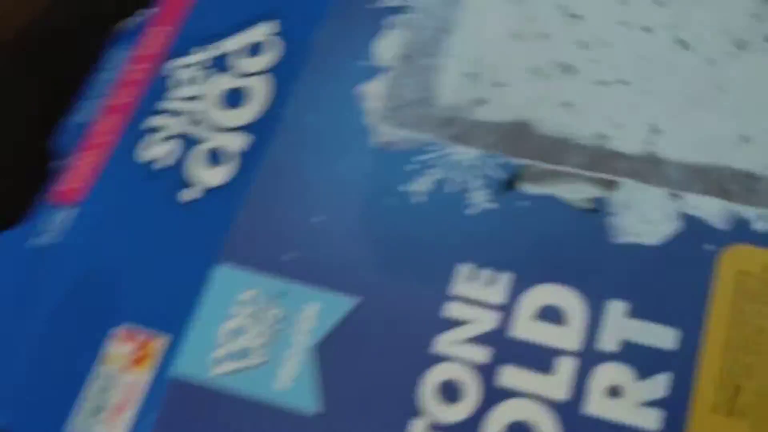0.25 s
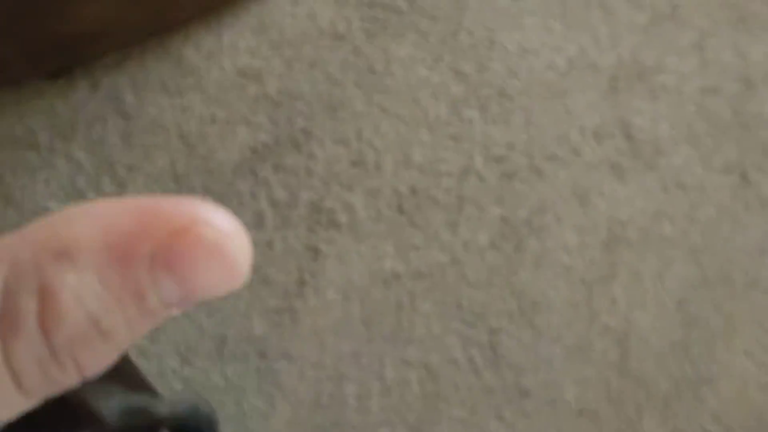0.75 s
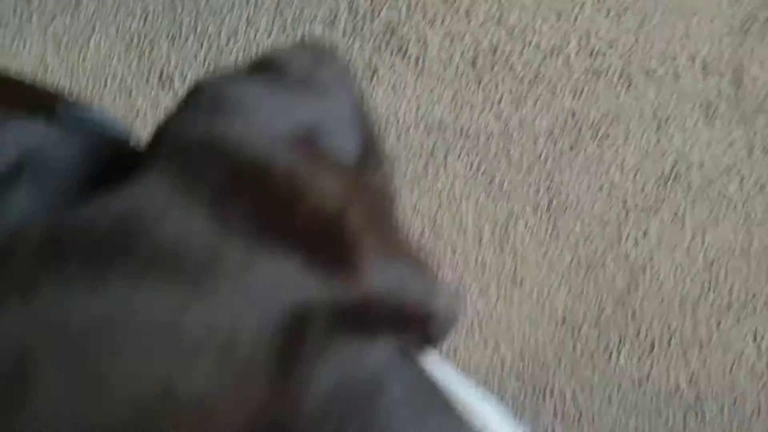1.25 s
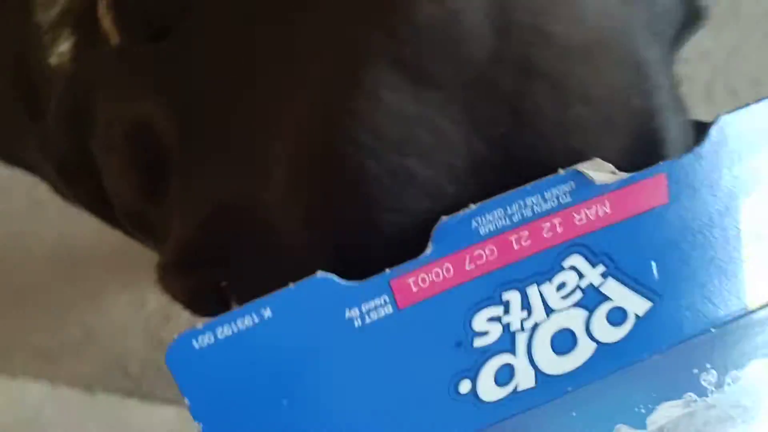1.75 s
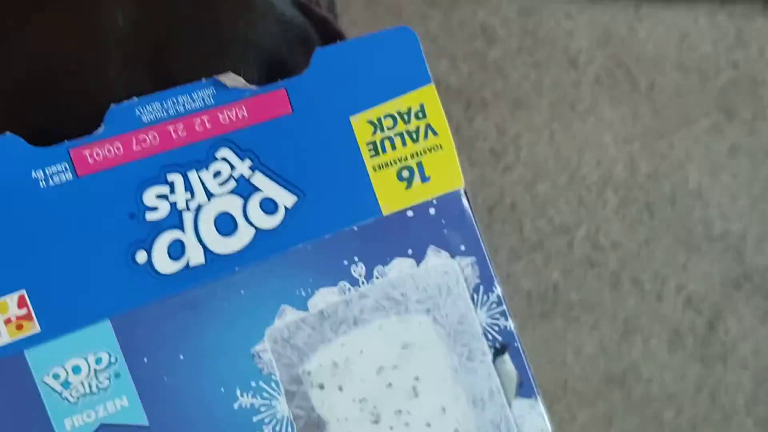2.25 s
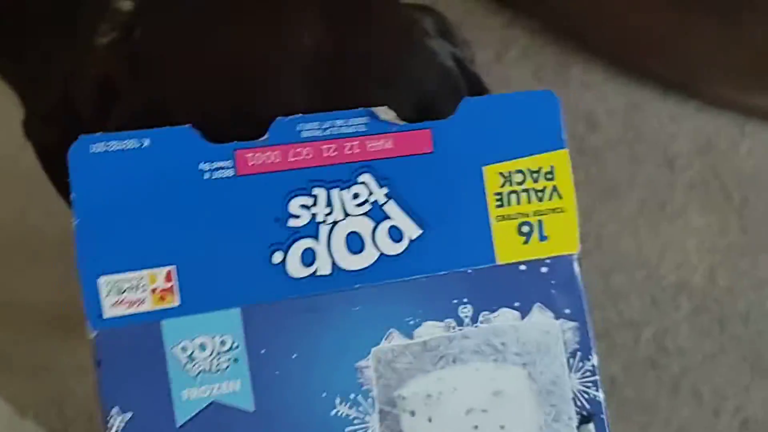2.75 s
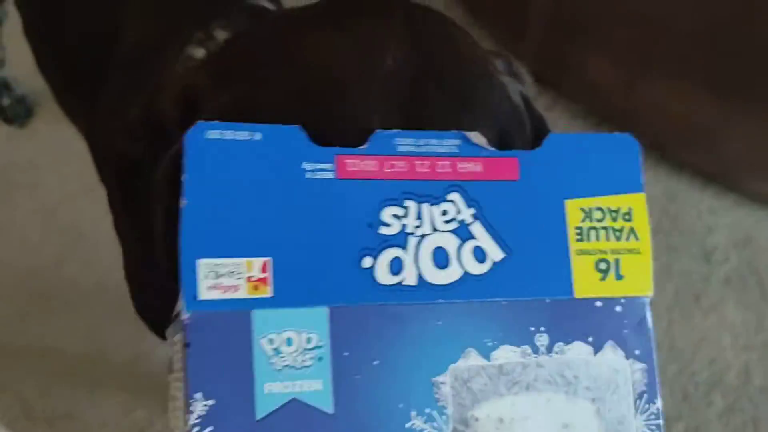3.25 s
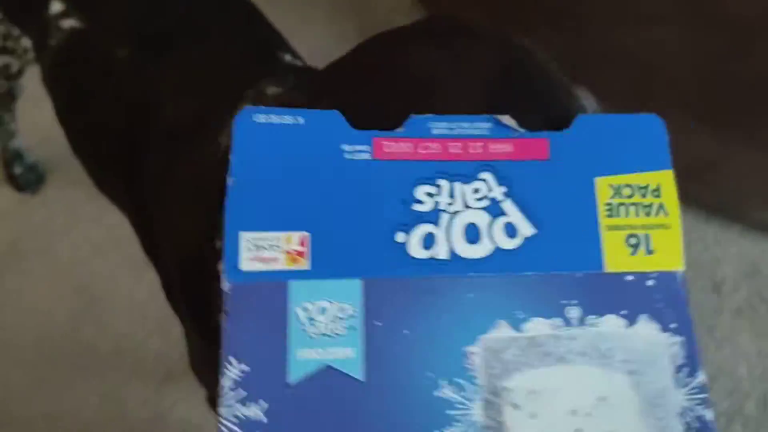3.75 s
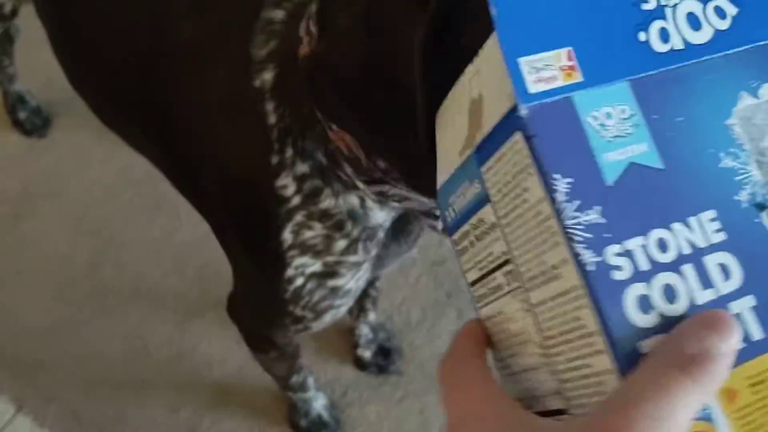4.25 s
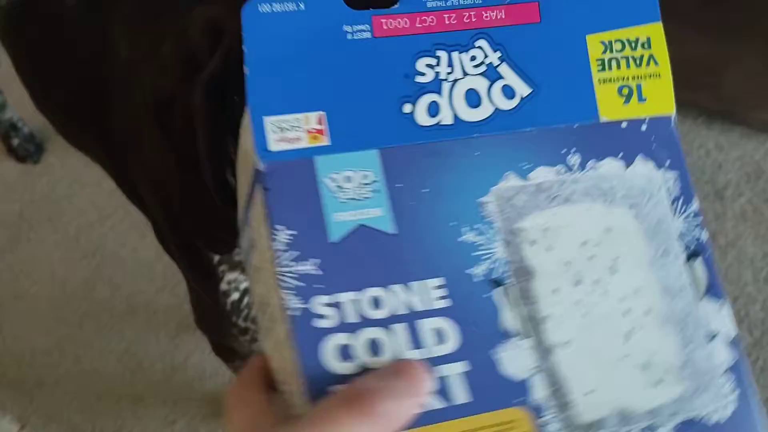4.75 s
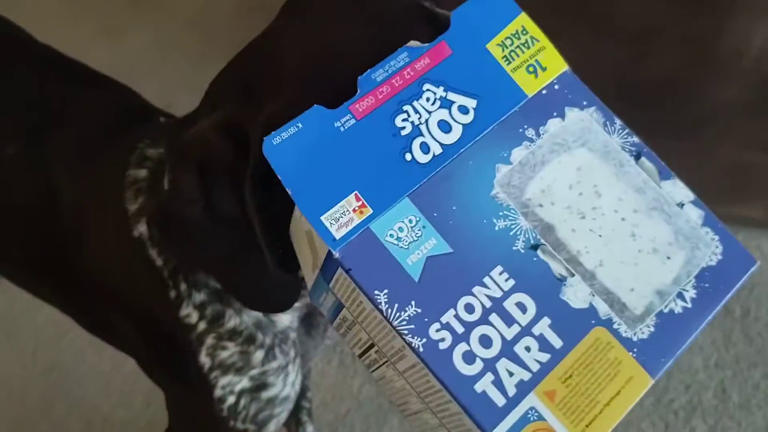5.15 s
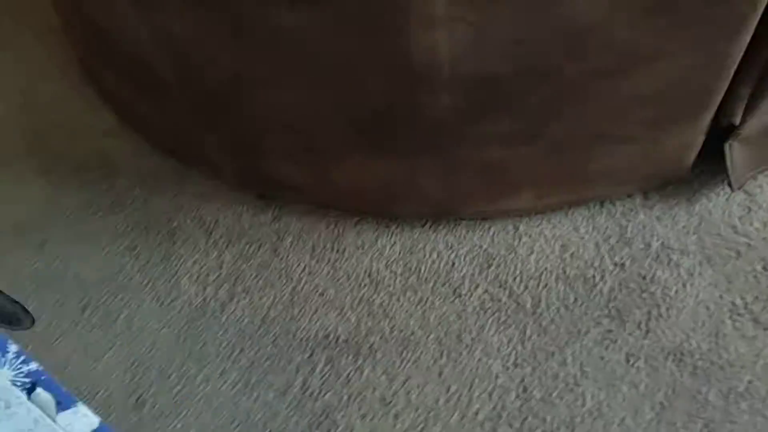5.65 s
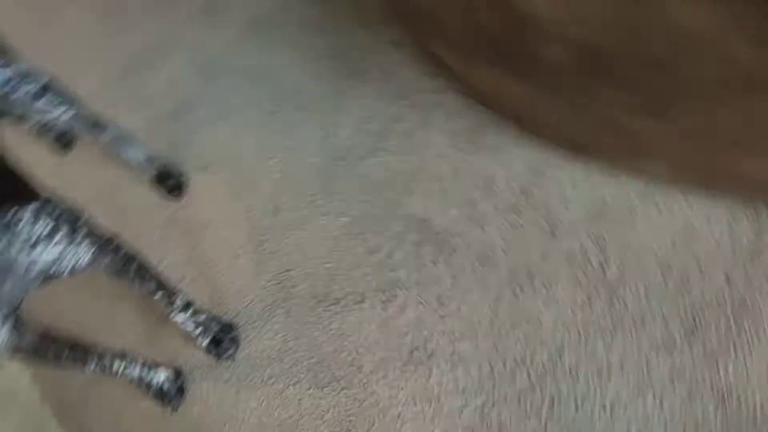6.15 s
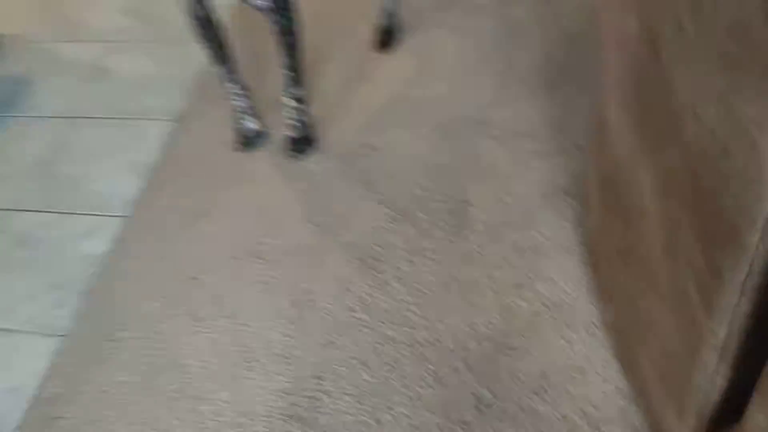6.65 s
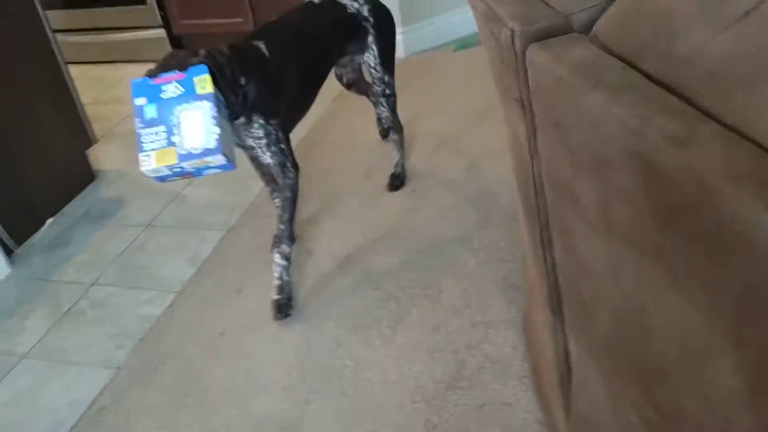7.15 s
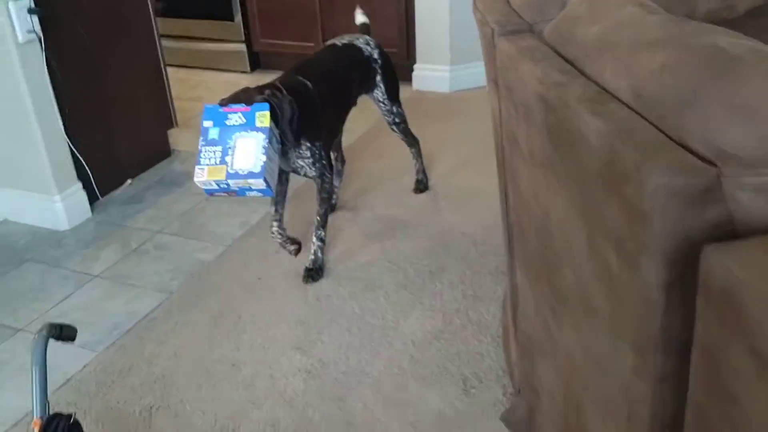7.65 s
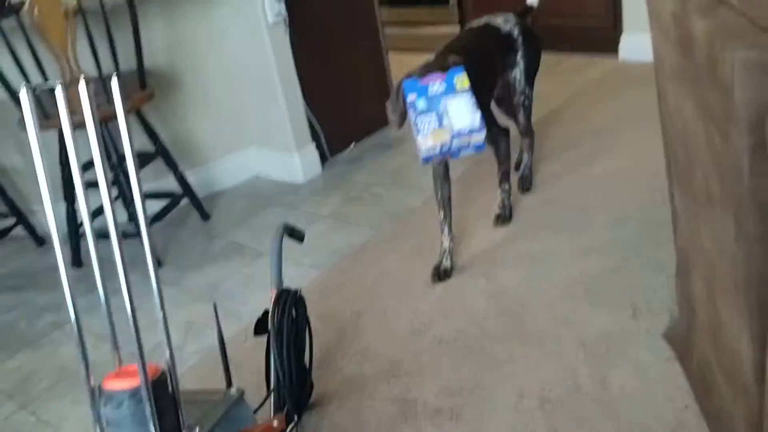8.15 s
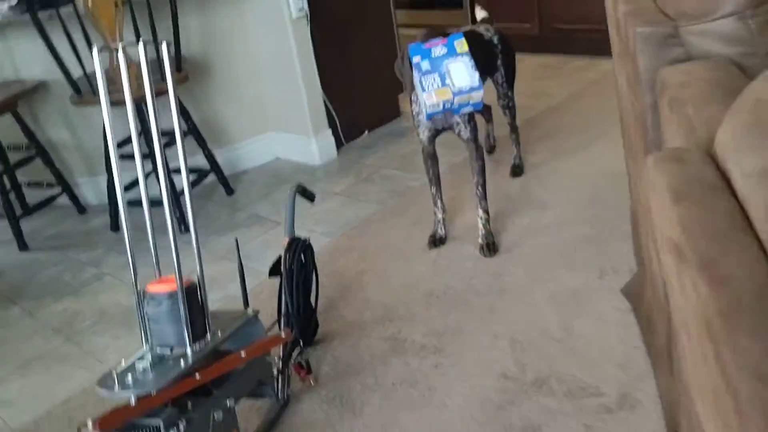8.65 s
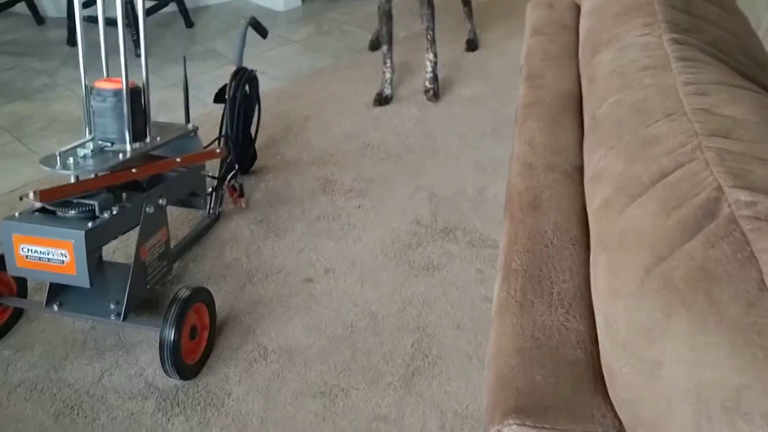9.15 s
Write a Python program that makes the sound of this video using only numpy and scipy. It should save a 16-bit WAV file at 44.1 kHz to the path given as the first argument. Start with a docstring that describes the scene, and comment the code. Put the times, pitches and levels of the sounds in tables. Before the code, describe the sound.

Uneven papery scuffing and swishing come from a cardboard box as a dog pushes its head around inside, very close to a handheld phone indoors. Several hollow knocks stand out, mixed with small ticks of card edges and claws. After a quieter stretch and more knocks, the dog backs off with dull steps on carpet, the box still rustling. Fingers briefly bump and rub the right side of the microphone over faint hiss.

```python
"""A carpeted room: a dog pushes its head into an empty cardboard box held close to a phone, then backs off.
Blows and small slips ring the box's walls and air, fur swishes on card, edges and claws tick,
and steps thud through the floor over a faint hiss. Fingers bump and rub the right microphone,
whose port sits in the resonant hollow of the hand that holds the phone."""
import sys
import numpy as np
from scipy import signal
from scipy.io import wavfile
from scipy.ndimage import uniform_filter1d

SR = 44100
rng = np.random.default_rng(int(sys.argv[2]) if len(sys.argv) > 2 else 0)


def put_to_file(sound):
    """Save the sound as 16-bit audio at rate SR, in the file named by the first command-line argument."""
    columns = np.atleast_2d(sound).T  # one column per channel
    safe = np.clip(columns, -1, 1)
    whole_steps = np.round(safe * 32767)
    wavfile.write(sys.argv[1], SR, whole_steps.astype(np.int16))


N = 414099

# hand cupping the right port: (time [s], lowest resonance [Hz], gain of the hollow [dB])
CUP = [(0, 2240, 14.5), (.3, 2030, 19), (.7, 2160, 11.5), (1.5, 2000, 21), (2.2, 2084, 17),
       (2.8, 1944, 20.5), (3.1, 2010, 18), (3.75, 1920, 17.5), (4.6, 2000, 14.5), (5, 1980, 17),
       (5.6, 2030, 10), (6.4, 2080, 11.5), (7.2, 1964, 11), (7.6, 2170, 8.5), (7.85, 2460, 16),
       (8.3, 2670, -10.5), (8.6, 2620, -12), (9.39, 2640, -14)]


def gain_of(db):
    return 10 ** (np.asarray(db) / 20)


def unit_rms(x):
    return x / np.sqrt(np.mean(x ** 2) + 1e-20)


def at_hz(points, hz):
    f, value = np.transpose(points)
    return np.interp(np.log(hz + 1), np.log(f + 1), value)


def curves(rows):
    s, *columns = np.transpose(rows)
    return [np.interp(np.arange(N) / SR, s, c) for c in columns]


def panned(db):
    return gain_of(np.array([db / 2, -db / 2]))


def add(mix, s, sound):
    part = mix[..., round(s * SR):][..., :sound.shape[-1]]
    part += sound[..., :part.shape[-1]]


def filtered(x, order, hz, kind):
    return signal.sosfilt(signal.butter(order, hz, kind, fs=SR, output="sos"), x)


def stroke_powers(rows, t, shape=2):
    """Power of each stroke, 20 dB down at one rise or fall from its top; shape 2: bell, 4: flat top."""
    s, db, rise_s, fall_s = np.transpose(rows)[:4, :, None]
    away = (t - s) / np.clip(np.where(t < s, rise_s, fall_s), .01, 1)
    return gain_of(db - np.minimum(20 * away ** shape, 200)) ** 2


def stroke_gain(rows, shape=2):
    t = np.arange(0, N + 128, 128) / SR
    return np.interp(np.arange(N) / SR, t, np.sqrt(stroke_powers(rows, t, shape).sum(0)))


def noise(colour_db, size, patchy_db, flicker_db):
    """Two-port noise from random spectra, shaped by colour_db(hz, t), roughened by patches and flicker."""
    likeness = [(60, 0.39), (180, 0.9), (550, 0.77), (1650, 0.0087), (4970, 0.05), (15000, 0.02)]  # between the ports: (frequency [Hz], correlation [-])
    hop = size // 4
    hz = np.fft.rfftfreq(size, 1 / SR)[:, None]
    t = np.arange(N // hop + 5) * hop / SR
    a, b, c, d, patches = rng.standard_normal((len(t), len(hz), 5)).T
    patches = unit_rms(uniform_filter1d(uniform_filter1d(patches, size=6, axis=0), size=12, axis=1))
    flicker = unit_rms(uniform_filter1d(rng.standard_normal(len(t)), size=3))
    same = np.clip(at_hz(likeness, hz), -1, 1)
    left = a + 1j * b
    spectra = np.array([left, same * left + np.sqrt(1 - same ** 2) * (c + 1j * d)])
    spectra *= gain_of(colour_db(hz, t) + patchy_db * patches + flicker_db * flicker)
    return signal.istft(spectra, nperseg=size, noverlap=size - hop)[1][:, :N]


def air():
    """Faint steady background hiss."""
    colour = [(24, -56), (40, -9), (126, -14.5), (501, 0), (553, -8), (1140, -12.5), (2880, -17.5),
              (3990, -20), (12000, -23.5), (15800, -25.5)]  # (frequency [Hz], level [dB])
    hiss = noise(lambda hz, t: at_hz(colour, hz), size=1024, patchy_db=-0.5, flicker_db=0.87)
    return gain_of(-71.5) * unit_rms(hiss)


def rumble():
    """The floor carries weight shifts as lumpy low noise."""
    shifts = [(0.0, -73.5), (0.6, -71.5), (1.23, -84), (1.99, -72), (2.19, -64), (2.32, -71.5), (2.95, -82),
              (4.89, -80.5), (5.1, -87), (5.44, -81.5), (6.36, -64), (6.51, -61), (7.24, -65),
              (7.43, -75.5), (7.71, -73.5), (7.9, -61.5), (8.29, -74.5), (9.39, -83)]  # floor rumble: (time [s], level [dB])
    colour = [(25, -52), (55, -2.5), (110, -3.5), (170, -4.5), (300, -42.5)]  # (frequency [Hz], level [dB])
    lumps = noise(lambda hz, t: at_hz(colour, hz), size=2048, patchy_db=-0.5, flicker_db=3.0)
    return gain_of(curves(shifts)[0]) * unit_rms(lumps)


def box_ring(force, t60_share, panels_db, edges_db, scatter_db):
    """Box modes, caught unevenly by place of touch; a small box radiates no deep bass."""
    box = [(111, -20, 0.2), (228, -31, 0.027), (345, 1, 0.097), (429, 1.5, 0.054), (594, 10, 0.026),
           (708, 2, 0.043), (855, -4, 0.055), (1040, 10.5, 0.019), (1353, 3.5, 0.02), (1588, -1.5, 0.043),
           (1870, -1, 0.059), (2215, -4, 0.052), (2650, 10.5, 0.01), (3700, -38, 0.022), (5480, -40, .015)]  # wall and air modes: (frequency [Hz], level [dB], t60 [s])
    bloom_ms = 0.39  # walls swinging up
    t = np.arange(3500) / SR
    hz, db, t60_s = np.transpose(box)[..., None]
    catch, detune = rng.standard_normal((2, len(box), 1))
    place_db = scatter_db * catch + panels_db * np.clip(np.log2(720 / hz), 0, 1) + edges_db * (hz > 1200)
    decay = gain_of(db + place_db - 60 * t / (t60_s * t60_share))
    modes = decay * np.sin(2 * np.pi * hz * (1 + 0.038 * detune) * t)
    walls = modes.sum(0) * (1 - np.exp(-t * 1000 / bloom_ms))
    return signal.oaconvolve(force, filtered(walls, 2, 165, "highpass"))


def scuffing():
    """Dense uneven slips ring the box as a low scuff and a papery edge; the bare slips rasp."""
    # head working in the box: (time [s], scuff [dB], papery edge [dB], rasp in the hand's hollow [dB])
    rooting = [(0, -63.5, -64, -77), (.3, -71.5, -78, -84), (.66, -60, -65, -54.5), (.9, -66.5, -74, -56.5),
               (1.2, -67, -70, -74), (1.55, -63, -91, -43.5), (1.72, -66, -75.5, -80),
               (2.05, -65, -71.5, -58.5), (2.4, -62, -60.5, -69), (2.6, -69.5, -78, -56),
               (2.88, -65.5, -73.5, -72), (3.7, -70, -76.5, -66), (4.16, -65, -72.5, -63),
               (4.5, -64.5, -73, -87), (5, -71.5, -78.5, -97), (5.44, -73, -78.5, -55.5),
               (5.7, -62.5, -71.5, -104), (6.6, -75, -78.5, -69), (7.3, -71.5, -77.5, -94.5),
               (7.9, -70, -74.5, -55), (8.25, -78.5, -79, -114.5), (9.39, -70.5, -100, -107)]
    shoves = [(3.45, -67.5, 0.11, 0.11), (3.72, -66, 0.1, 0.04), (5.16, -64, 0.18, .15),
              (5.43, -64.5, 0.038, 0.093), (5.7, -64.5, .06, 0.16), (5.85, -57, 0.056, 0.1),
              (6.1, -60, 0.062, 0.051), (6.3, -63.5, 0.039, 0.11), (6.58, -61, 0.2, 0.36),
              (6.85, -60, 0.054, 0.12), (7.14, -65.5, 0.33, 0.059), (7.55, -72, 0.022, 0.025),
              (7.72, -68, 0.045, 0.055), (8.05, -66.5, 0.064, .15), (8.38, -68, 0.066, 0.049),
              (8.54, -66, 0.023, 0.069), (8.9, -67, 0.064, 0.053)]  # louder scuffs: (top [s], level [dB], rise [s], fall [s])
    slips_per_s, restless_db, restless_s, shove_paper_db = 600, 3.5, 0.065, -15
    band = lambda x, lo_hz, hi_hz: unit_rms(filtered(x, 3, [lo_hz, hi_hz], "bandpass"))
    size = gain_of(1.3 * np.minimum(rng.exponential(1, (2, N)), 4))
    head_moves = unit_rms(uniform_filter1d(rng.standard_normal(N), round(restless_s * SR)))
    impulses = (rng.random((2, N)) < slips_per_s / SR) * rng.choice([-1, 1], (2, N))
    slips = gain_of(restless_db * head_moves) * size * impulses
    slips[1] = 0.93 * slips[0] + 0.56 * slips[1]
    rung = np.array([box_ring(port, 0.52, panels_db=-5.5, edges_db=3.0, scatter_db=1.5)[:N]
                     for port in slips])
    scuff_db, papery_db, rasp_db = curves(rooting)
    shove = stroke_gain(shoves)
    scuff = (gain_of(scuff_db) + shove) * band(rung, 169, 570)
    papery = (gain_of(papery_db) + gain_of(shove_paper_db) * shove) * band(rung, 857, 1460)
    rasp = gain_of(rasp_db - curves(CUP)[1]) * band(slips, 1570, 2116)  # cupped() adds the gain back
    return scuff + papery + rasp


def swish():
    """Friction hiss of fur and nose on card and of cloth; each stroke tilts it about 6 kHz."""
    # sliding strokes: (top [s], level [dB], rise [s], fall [s], L-R [dB], tilt [dB/octave])
    strokes = [(.02, -69, 0.12, .12, 0, 0), (.17, -66, 0.084, 0.16, -1, 2.5),
               (.39, -63, 0.03, 0.1, 1.5, -8.5), (.53, -66, 0.22, 0.09, -9, -4.5),
               (.68, -65, 0.078, 0.17, -3.5, -4), (.91, -66.5, 0.1, 0.099, -4.5, -2),
               (1.03, -58.5, 0.037, 0.073, -2, 2.5), (1.15, -60, 0.1, 0.085, -4, -0.5),
               (1.41, -60, 0.21, 0.27, -1, 1), (1.56, -52.5, 0.28, 0.11, 0, 2.6),
               (1.74, -62, 0.22, 0.15, 1, 1.5), (1.87, -64, 0.036, 0.24, -1, 0.5),
               (2.06, -67.5, 0.17, 0.13, -2.5, 3.5), (2.31, -55.5, 0.086, 0.22, -3, 4),
               (2.44, -58.5, 0.21, 0.13, -0.5, 3.5), (2.6, -72.5, 0.43, 0.38, 3, -1),
               (2.78, -73, 0.029, 0.038, -3, 8), (3.66, -86, 0.1, .1, -20, -3.5),
               (4.03, -65, 0.14, .13, -3.5, 0), (4.32, -74.5, 0.056, 0.23, 1, -0.5),
               (4.76, -73.5, 0.078, 0.05, -6, -5), (4.98, -65.5, 0.026, 0.03, -2, 3.5),
               (5.11, -64, 0.11, 0.077, -2, -2.5), (5.35, -61.5, .03, 0.26, -5, 2.5),
               (5.44, -58, .1, 0.086, -0.5, 3), (5.7, -73, .3, 0.22, 0, 4), (6, -62.5, 0.02, 0.035, -3, -1),
               (6.12, -69, 0.16, 0.13, -4, 2.5), (6.3, -69.5, 0.045, 0.1, -4, 1),
               (6.5, -65.5, 0.19, .2, -2.5, 1.5), (6.81, -60.5, 0.06, 0.053, -2, 0),
               (6.88, -59.5, 0.022, 0.035, -10.5, 0.5), (7.061, -63, .04, .08, -7, 0.5),
               (7.12, -57, 0.087, 0.087, 4.5, 0.5), (7.23, -58, 0.13, 0.057, 0, 2),
               (7.422, -58.5, 0.095, 0.057, 2, 3.5), (7.5, -70, 0.16, 0.1, 2, -1.5),
               (7.71, -66, 0.083, .05, 9, 4.5), (7.779, -58, 0.072, 0.063, 7.5, 6.5),
               (8.27, -67.5, 0.47, 0.25, 2.5, -0.5), (8.65, -75.5, 0.23, 0.1, 5, -1.5),
               (8.89, -70, 0.022, 0.17, 4, -4), (9.1, -67, 0.21, 0.21, 1, 2)]
    colour = [(500, -14), (1200, 9), (2000, 5.5), (3000, 8.5), (4500, 4), (8000, 3.5), (11000, -5.5),
              (16000, -13)]  # friction spectrum: (frequency [Hz], level [dB])
    glint_hz, glint_octaves = 10740, 0.14  # extra peak of bright strokes
    pans_db, tilts_db = np.transpose(strokes)[4:]

    def blend(column, t):
        power = stroke_powers(strokes, t)
        return column @ power / power.sum(0)  # loudest stroke leads

    def colour_db(hz, t):
        tilt_db = np.clip(blend(tilts_db, t), -10, 10)
        octaves = np.log2(np.maximum(hz, 1500) / 6000)
        glint = np.exp(-(np.log2((hz + 1) / glint_hz) / glint_octaves) ** 2)
        return at_hz(colour, hz) + tilt_db * octaves + 0.95 * np.maximum(tilt_db, 0) * glint

    hiss = noise(colour_db, size=256, patchy_db=2.0, flicker_db=1.0)
    t = np.arange(0, N, 128) / SR
    pan_db = np.interp(np.arange(N) / SR, t, blend(pans_db, t))
    return stroke_gain(strokes) * panned(pan_db) * unit_rms(hiss)


def ticks():
    """Card edges and claws give tiny bursts of bright noise."""
    events = [(0.0353, -53.5, 23), (0.4693, -46, 6), (0.4893, -42, -14), (0.5412, -45.5, 16),
              (0.5924, -56, 16), (1.6896, -45.5, -4), (2.2468, -50, 25.5), (4.7426, -58.5, 29),
              (4.846, -59, 0), (5.011, -40, 0), (5.9923, -54, -6), (6.2776, -55, -6), (6.4303, -52, 20),
              (6.5081, -47, -6), (6.6388, -47, -6), (6.8763, -51, -21), (7.872, -42, 2), (8.0194, -40, 7),
              (8.9979, -53.5, -18)]  # dry ticks: (time [s], level [dB], L-R [dB])
    t60_s = 0.034
    out, t = np.zeros((2, N)), np.arange(2000) / SR
    for s, db, pan_db in events:
        burst = gain_of(-60 * t / t60_s) * rng.standard_normal(len(t))
        add(out, s, panned(pan_db)[:, None] * gain_of(db) * burst / abs(burst).max())
    return filtered(out, 1, [2200, 9000], "bandpass")


def knocks():
    """A soft contact pulse, two quick rebounds and faint flap chatter ring the box."""
    # blows: (time [s], level [dB], contact [ms], rebound [dB], big panels [dB], stiff edges [dB], L-R [dB])
    blows = [(0.041, -51, 0.27, 0, -11, -12, -16), (0.382, -40, 0.19, 0, -3.5, 11, -8.5),
             (0.436, -46, 0.31, -9, 1, -3, -3), (0.469, -20, 0.07, -17, -10, 0, -3),
             (0.489, -17, 0.4, -6, -5.5, 6.5, -3.5), (0.539, -17, 0.1, -8, 2, -1.5, -3.5),
             (0.859, -51, 0.45, -5, 1, -6, -13), (1.095, -48.5, 0.28, -4, -28, 0, -8),
             (1.688, -41.5, 0.11, -14, 2, 5, -4), (1.864, -51, 0.16, -9, -10, -1, -9),
             (2.031, -47, 0.37, -19, -5, 5, -5), (2.243, -11.5, 0.64, -7.5, -20, 1, -7),
             (2.587, -38.5, 0.59, -17, -5, 8, -3.5), (2.703, -39, 0.45, -23, -4, 7.5, -5),
             (2.728, -49, 0.48, -29, 33, -2, 3), (3.612, -63, 0.42, -16, -12, 0, 4),
             (3.832, -50, 0.55, -21, 0, 10, -6), (4.032, -24.5, 0.32, -16, -20, -12.5, -8),
             (4.311, -52.5, 0.45, 6, -20, 7, 1), (4.501, -54, 0.43, -9, 18, -6, -1.5),
             (4.755, -48, 0.42, -20, 2, -5, -1), (5.009, -27, 0.59, -12, 5, 2.5, -3.5),
             (5.139, -27, 0.93, -16.5, 0, 3, -3.5), (5.646, -51, 0.56, -2, -14, -1, -9),
             (5.805, -53, 0.56, -11, -8, -7, 8), (5.845, -52, 0.59, -17, -18, -22, 2),
             (6.282, -53, 0.097, -6, 15, 13, -4), (6.636, -42.5, 0.53, -9, 6, -1, -5),
             (7.703, -53.5, 0.53, -9, -29, -3, -7), (8.877, -50, 0.097, 4, -3, 6.5, 0),
             (9.102, -50.5, 0.2, -10, -12, 10.5, 10)]
    chatter_db, chatter_t60_s, chatter_hz, chatter_per_s = -18, 0.28, 910, 1500
    t60_share = 0.46  # head or hand damps the box
    knock_delay_s = 0.001485  # each knock sounds 1.5 ms after its listed time
    out, t = np.zeros((2, N)), np.arange(8000) / SR
    for s, db, contact_ms, rebound_db, panels_db, edges_db, pan_db in blows:
        flaps = rng.standard_normal(len(t)) * (rng.random(len(t)) < chatter_per_s / SR)
        hits = filtered(gain_of(chatter_db - 60 * t / chatter_t60_s) * flaps, 1, chatter_hz, "lowpass")
        hits[0] = 1
        for rebound_s in (.0043, .0085):
            hits[round(rebound_s * rng.uniform(.9, 1.1) * SR)] = gain_of(rebound_db)
        u = t[:400] * 1000 / contact_ms
        force = signal.oaconvolve(hits, u * np.exp(-u * np.e))
        body = box_ring(force, t60_share, panels_db, edges_db, scatter_db=3)
        small_walls = box_ring(force, t60_share, -38, edges_db, scatter_db=3)
        blow = body + np.array([[0.48], [-0.48]]) * small_walls  # each port hears these its own way
        add(out, s + knock_delay_s, panned(pan_db)[:, None] * gain_of(db) * blow / abs(blow).max())
    return out


def thuds():
    """The floor answers each step with two low, quickly dying modes."""
    steps = [(0.492, -29.5, 131), (0.55, -38, 130), (1.679, -54, 126), (1.869, -57, 108), (1.968, -57, 72),
             (2.02, -47.5, 99), (2.159, -42.5, 114), (2.24, -40, 103), (5.006, -41, 111), (6.019, -47, 129),
             (6.3, -39.5, 61.5), (6.358, -47.5, 94), (6.515, -36, 66.6), (6.572, -55, 62.5),
             (6.68, -57, 51.1), (6.79, -49.5, 80), (6.918, -51, 84), (7.119, -52, 117), (7.682, -53, 101),
             (8.54, -58, 74.6), (8.878, -60, 54.4)]  # steps and paws: (time [s], peak [dB], frequency [Hz])
    rise_ms, t60_cycles = 9, 8.9
    out, t = np.zeros(N), np.arange(12000) / SR
    for s, db, hz in steps:
        swing = np.sin(2 * np.pi * hz * t) + 0.32 * np.sin(2 * np.pi * (2.32 * hz * t + rng.random()))
        thud = swing * (1 - np.exp(-t * 1000 / rise_ms)) * gain_of(-60 * t * hz / t60_cycles)
        add(out, s, gain_of(db) * thud / abs(thud).max())
    return out


def fingers():
    """Bumps jolt the right port and push air in and out; a sliding fingertip gives grainy hiss."""
    bumps = [(1.451, -61, -13), (4.145, -59, 5), (5.768, -47, -5), (6.576, -46, -1), (6.639, -35.5, -4.5),
             (6.876, -33, -13), (7.268, -48, -16.5), (7.38, -57, -1), (7.874, -44.5, 8), (7.889, -42.5, 6),
             (7.896, -56, 15), (7.923, -51.5, 6), (8.003, -42, 1), (8.183, -61, 3), (8.024, -52, 12.5),
             (8.316, -55, -22)]  # finger bumps: (time [s], level [dB], jolt re push [dB])
    rubs = [(7.88, -65.5, 0.036, 0.037), (7.92, -56.5, 0.028, 0.025), (7.98, -56.5, 0.047, 0.057),
            (8.015, -54.5, 0.046, 0.044), (8.12, -63, 0.016, 0.045), (8.165, -51.5, 0.034, 0.037)]  # fingertip slides: (middle [s], level [dB], rise [s], fall [s])
    colour = [(400, -5), (1000, -1.5), (2600, 6), (4200, 0.5), (7000, 0), (11000, 1), (16000, -4.5)]  # rub spectrum: (frequency [Hz], level [dB])
    push_s, jolt_s = 0.0041, 0.00013
    out, t = np.zeros(N), np.arange(3000) / SR
    u, v = t / push_s, t / jolt_s
    push = -np.sin(np.pi * u) * np.exp(-.8 * u)
    for s, db, jolt_db in bumps:
        jolt = 2 * v * (2 - v) * np.exp(-v) + 0.018 * np.exp(-t / 0.002) * rng.standard_normal(len(t))
        add(out, s, gain_of(db) * (push + gain_of(jolt_db) * jolt))
    hiss = unit_rms(noise(lambda hz, t: at_hz(colour, hz), size=256, patchy_db=1.5, flicker_db=2.0)[1])
    return gain_of([[-16], [7]]) * (out + stroke_gain(rubs, shape=4) * hiss)


def room(x):
    """Reflections: sparse taps of random sign, each band dying at its own speed."""
    decay = [(100, 0.32), (400, 0.51), (1500, 0.3), (6000, 0.23)]  # reverberation: (frequency [Hz], t60 [s])
    taps = np.zeros((2, SR // 2))
    at = np.arange(200, SR // 2 - 20, 20) + rng.integers(0, 20, (2, (SR // 2 - 201) // 20))
    np.put_along_axis(taps, at, rng.choice([-1., 1.], at.shape), 1)
    taps[1] = 0.7 * taps[0] + 0.34 * taps[1]
    hz, t, spectra = signal.stft(taps, SR, nperseg=256)
    tail = signal.istft(spectra * gain_of(-60 * t / at_hz(decay, hz)[:, None]), SR, nperseg=256)[1]
    return signal.fftconvolve(x[None], tail / np.linalg.norm(tail[0]), axes=1)[:, :N]


def resonate(x, hz, width_hz):
    """Moving resonance of gain 1, in two passes: shift hz to zero, smooth, shift back."""
    turn = np.exp(2j * np.pi * np.cumsum(hz * np.ones(len(x))) / SR)
    pole = np.exp(-np.pi * width_hz / SR)
    for _ in range(2):
        x = 2 * (turn * signal.lfilter([1 - pole], [1, -pole], x / turn)).real
    return x


def cupped(x):
    """The hollow of the hand adds resonances to the right port; the palm adds a weaker one to the left."""
    upper = [(3610, 1200, -23.5), (5630, 780, -13.5)]  # higher modes of the hollow: (frequency [Hz], width [Hz], level [dB])
    palm = [(0, 2230, -10), (1.5, 2020, -3), (2.8, 2120, 4), (3.5, 2030, -18), (5.5, 2050, -10),
            (6.3, 2470, -16), (7, 2630, -6), (7.7, 2800, 2.5), (8.3, 2660, 1), (8.7, 2700, -1),
            (8.9, 2700, -2.5), (9.39, 2760, -2.5)]  # palm at the left port: (time [s], resonance [Hz], gain [dB])
    cup_hz, cup_db = curves(CUP)
    palm_hz, palm_db = curves(palm)
    hollow = resonate(x[1], cup_hz, width_hz=608)
    hollow += sum(gain_of(db) * resonate(x[1], hz, width_hz) for hz, width_hz, db in upper)
    left = gain_of(palm_db) * resonate(x[0], palm_hz, width_hz=510)
    return x + np.array([left, gain_of(cup_db) * hollow])


def scene():
    """Knocks and steps excite the room; all but the fingers pass through the cupped hand."""
    blows, steps, hiss = knocks(), thuds(), air()
    reverb = gain_of(-14.5) * room(blows.mean(0) + steps)
    around = blows + steps + reverb + scuffing() + rumble() + swish() + ticks() + hiss
    return cupped(around) + fingers()


def record(dry):
    """Sound reaches the left port 3 samples late; the microphones lose deep bass; then a band limit."""
    late = np.array([np.roll(dry[0], 3), dry[1]])
    thin = filtered(late, 3, 52, "highpass")
    band_limit = signal.firwin(511, 15900, window=("kaiser", 9), fs=SR)
    return signal.oaconvolve(thin, band_limit[None], "same")


dry = scene()
out = record(dry)
put_to_file(out)
```